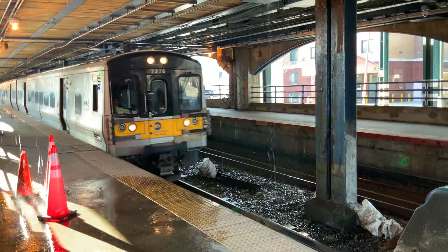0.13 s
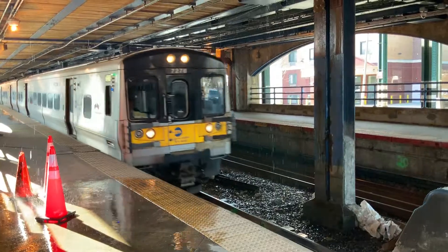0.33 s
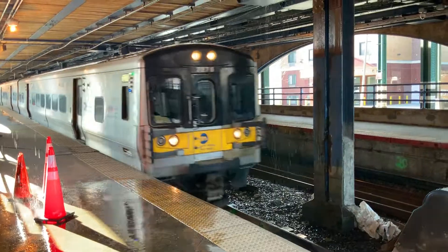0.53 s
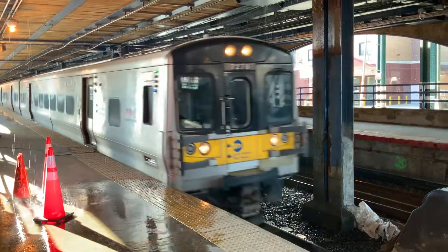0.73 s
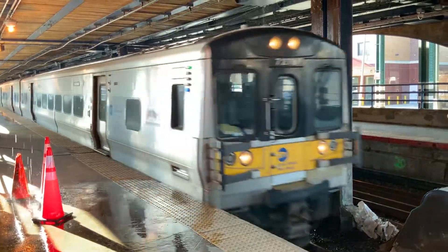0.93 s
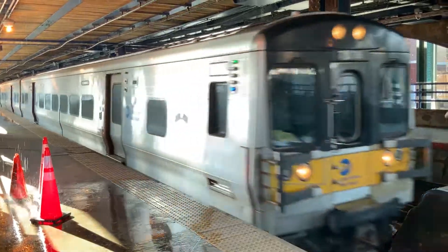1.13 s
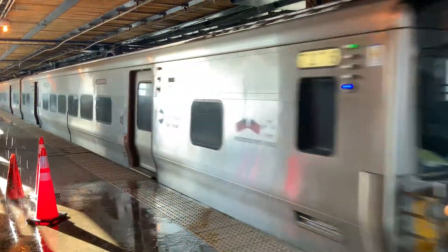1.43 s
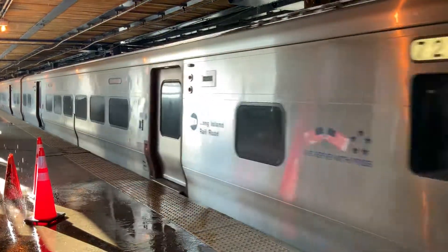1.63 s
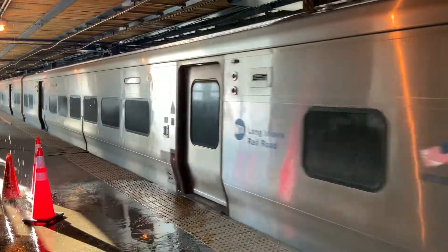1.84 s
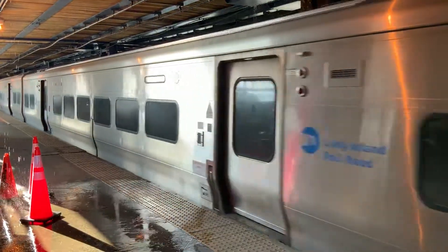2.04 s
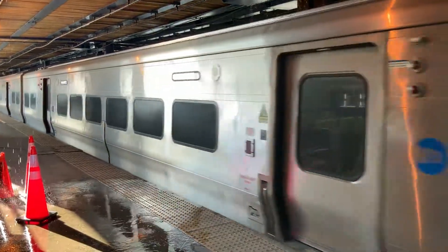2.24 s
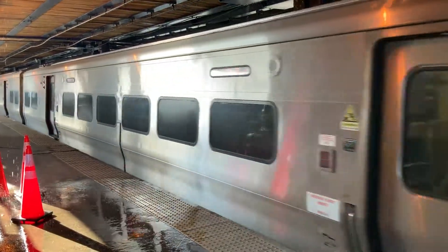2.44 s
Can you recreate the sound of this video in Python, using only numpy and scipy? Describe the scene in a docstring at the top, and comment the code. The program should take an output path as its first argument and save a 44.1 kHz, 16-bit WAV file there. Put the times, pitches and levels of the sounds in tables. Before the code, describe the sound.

Train rolling in along a covered station platform, rumbling and hissing, with wheels clacking over a joint

```python
"""A train is heard rolling in along a covered, wet platform: rumble, drone, roar and hiss, all shaped noise.
The wheels ring on the rail and a flange squeals faintly, as wavering tones and narrow-band noise. Two axles
clack over a rail joint and the bogies thump, as decaying modes and noise bursts. The running gear booms and the
rail sings in swelling tones; the roof gives the clang and sizzle of the clacks a short tail. The train is on
the right, so the left port hears it later, weaker and only partly alike."""
import sys
import numpy as np
from scipy import signal
from scipy.fft import rfft, irfft
from scipy.io import wavfile

SR = 44100
rng = np.random.default_rng(int(sys.argv[2]) if len(sys.argv) > 2 else 0)


def persist_wave(psi):
    """Save psi, clipped to +-1, as 16-bit WAV."""
    counts = np.round(np.clip(psi, -1, 1) * 32767).astype(np.int16)
    wavfile.write(sys.argv[1], SR, np.atleast_2d(counts).T)


N = 113778
# Time axis in seconds and frequency axis in Hz
T, HZ = np.arange(N) / SR, np.fft.rfftfreq(N, 1 / SR)


def rolling():
    """Broadband rolling noise: body and running gear below, wheel and rail above, modulated by uneven treads."""
    # Spectra of the sources. Each row: frequency in Hz, relative power density in dB per Hz.
    rumble_spectrum = [(15, -76), (30, -46), (60, -42.5), (100, -42), (150, -44.5), (250, -55.5),
                       (500, -86)]  # cars
    drone_spectrum = [(50, -55), (100, -47.5), (135, -42), (172, -38), (205, -43.5), (255, -42),
                      (315, -45.5), (380, -49), (520, -55.5), (1000, -83.5)]  # running gear
    roar_spectrum = [(200, -86), (370, -57.5), (460, -50), (560, -52.5), (650, -49.5), (770, -51.5),
                     (950, -52), (1080, -54), (1250, -61), (1650, -61.5), (2150, -59.5), (2500, -64),
                     (3300, -61.5), (6000, -76.5), (12000, -113)]  # wheels on rail
    hiss_spectrum = [(1500, -70), (2700, -70.5), (3400, -66), (4400, -61), (5250, -62.5), (5600, -67.5),
                     (6600, -65.5), (8000, -70), (10000, -73.5), (15000, -74.5)]  # wet rail
    spray_spectrum = [(4000, -95), (7500, -74), (9600, -75.5), (10200, -74.5), (12000, -71.5), (14200, -71),
                      (15500, -79)]  # fine spray above the hiss
    # Strength of the same sources along time. Each row: time in seconds, relative level in dB.
    rumble_level = [(.12, 2), (.4, -2.5), (.52, 0), (.77, 2), (.9, 1.5), (1.35, 0.5), (1.55, -1), (1.85, 2),
                    (2.03, 3), (2.12, 3), (2.25, -2.5), (2.45, 2.5), (2.58, -4)]
    drone_level = [(.12, -9), (.6, -4.5), (.98, -3), (1.22, -1), (1.37, 0), (1.52, -2), (1.85, -3),
                   (2.0, 2), (2.25, 1), (2.43, 1.5), (2.58, 2)]  # grows as the first bogie comes near
    roar_level = [(.12, -2), (.5, -1), (.9, -0.5), (1.15, 1.5), (1.35, 2.5), (1.6, 2), (1.8, 0.5),
                  (1.93, 2.5), (2.25, 1.5), (2.43, 3), (2.58, 1.5)]
    hiss_level = [(.12, -5.5), (.42, 2), (.68, 2), (.9, -1), (1.15, -0.5), (1.38, -5), (1.6, -4.5),
                  (1.8, -4), (2.05, -1), (2.2, 2), (2.42, 3.5), (2.58, -1)]
    spray_level = [(.12, 2), (.3, 0.5), (.55, 0.5), (.9, -6), (1.15, -5), (1.39, -7), (1.58, 1.5),
                   (1.67, -2.5), (1.92, 1.5), (2.2, -0.5), (2.58, -2.5)]

    rumble = noise(rumble_spectrum) * level(rumble_level)
    drone = noise(drone_spectrum) * level(drone_level)
    roar = noise(roar_spectrum) * level(roar_level)
    hiss = noise(hiss_spectrum) * level(hiss_level)
    spray = noise(spray_spectrum) * level(spray_level)
    lower = (rumble + drone + roar) * flutter(depth_db=1.17, rate_hz=32.8)
    upper = (hiss + spray) * flutter(depth_db=0.98, rate_hz=12)
    return lower + upper


def wheel_ring():
    """Modal resonance: two wheel modes, part tone and part noise, sink in pitch; a flange adds rough chirps."""
    # Wheel modes. Each row: frequency in Hz, width in Hz, tonal share of the power 0-1, relative level in dB.
    ring_modes = [(1957, 54, 0.38, -30.5), (2940, 114, 0.03, -32.5)]
    # Strength of the lower, then of the upper mode. Each row: time in seconds, relative level in dB.
    ring_levels = [
        [(.12, -5.5), (.33, 1), (.45, -1.5), (.54, 4), (.62, -1.5), (.9, -1.5), (1.2, -5), (1.65, 2.5),
         (2.22, 1.5), (2.35, -2.5), (2.58, 2.5)],
        [(.12, -2.5), (.4, -3), (1.1, 0), (1.35, -0.5), (1.72, 1.5), (2.15, -5.5), (2.45, 4.5), (2.58, -2)],
    ]
    # Flange squeals. Each row: start in seconds, length in seconds, mid pitch in Hz, glide in Hz per second,
    # relative level in dB.
    squeals = [(1.652, 0.034, 4420, -1500, -27), (1.683, 0.033, 4330, -4000, -27),
               (1.743, .032, 4320, 1000, -33.5), (1.779, .032, 4250, 2497, -31),
               (1.812, .034, 4220, 0, -33), (1.849, 0.023, 4300, -3000, -33)]
    doppler_per_s = 0.003796  # fall of pitch, as a share of the mode frequency

    out = swells(squeals, waver_hz=100.4, rate_hz=248)
    pitch_factor = 1 - doppler_per_s * (T - T.mean())
    for (hz, width_hz, tonal, db), curve in zip(ring_modes, ring_levels):
        sung = np.sqrt(tonal) * tone(hz * pitch_factor, waver_hz=12.1, rate_hz=20.2)
        shaken = np.sqrt(1 - tonal) * resonance(hz, width_hz)
        out += amp(db) * level(curve) * (sung + shaken)
    return out


def rail_joint():
    """Impact excitation: blows ring track and steel directly; clang and sizzle also spread under the roof."""
    # Wheel blows at the joint. Each row: start in seconds, then relative levels of knock, ring, clang
    # and sizzle in dB.
    clacks = [(1.0317, 8, -6, 1.5, -4), (1.041, 2, -12, -7, -1), (1.047, 6.5, 1, -2, -4),
              (1.062, 3, -14, -4, -12), (1.072, -5, -5, 1.5, -2.5), (1.084, 2, -14, -19, -16),
              (1.096, 1, -7, -2.5, -9), (1.120, 3, -14, -7, -20), (1.146, 3, -16, -23, -22),
              (1.163, -2, -18, -24, -26), (1.412, -6, -10, -8, -2), (1.424, -1, 1, -0.5, -0.5),
              (1.435, -3, 6.5, 0.5, -5), (1.446, -3, 0, -1, -16), (1.459, -8, -12, -4, -12)]
    # Low modes of the track, high modes of the steel rail. Each row: frequency in Hz, relative level in dB, #
    # time to decay by 60 dB in seconds.
    track_modes = [(317, -23, .07), (441, -25.5, 0.061), (540, -19, 0.039), (651, -11, 0.047),
                   (718, -12.5, 0.017), (900, -26, 0.021)]
    steel_modes = [(1830, -22, 0.068), (2130, -19.5, 0.075), (3060, -30, 0.055), (3500, -22, 0.074)]
    # Noise of the steel. Each row: frequency in Hz, relative power density in dB per Hz.
    clang_spectrum = [(150, -51), (480, -44), (850, -44), (1100, -57.5), (1450, -55.5), (1800, -55.5),
                      (2170, -55), (2550, -59.5), (3050, -60), (3900, -52), (5000, -58.5), (8000, -72),
                      (15000, -93)]
    sizzle_spectrum = [(3000, -71), (6000, -60), (9000, -59.5), (10500, -56.5), (14000, -57.5),
                       (15500, -64)]

    times, knock_db, ring_db, clang_db, sizzle_db = np.transpose(clacks)
    clang = noise(clang_spectrum) * blows(times, clang_db, t60=0.16)
    sizzle = noise(sizzle_spectrum) * blows(times, sizzle_db, t60=0.16)
    knock = strike(times, knock_db, track_modes)
    ring = strike(times, ring_db, steel_modes)
    return roof(clang + sizzle) + knock + ring


def bogies():
    """Impact and resonance at low frequency: the suspension thumps, the running gear booms and the rail sings."""
    # Dull thumps. Each row: start in seconds, relative level in dB.
    thump_times = [(1.033, -2), (1.224, -4), (1.299, -8), (1.495, -5.5), (1.585, -10), (1.954, -4.5),
                   (2.004, 2.5), (2.395, 3.5), (2.483, 2)]
    # Noise of a thump. Each row: frequency in Hz, relative power density in dB per Hz.
    thump_spectrum = [(40, -41), (120, -52), (260, -39), (370, -34.5), (600, -62), (1200, -88)]
    # Modes of a thump. Each row: frequency in Hz, relative level in dB, time to decay by 60 dB in seconds.
    thump_modes = [(65, -30, 0.084), (167, -19, 0.065), (268.5, -18.5, 0.26), (315, -19, 0.14)]
    # Resonances that swell and fade as the train rolls: the rows at 670 and 623 Hz are the rail singing, # the
    # rest the running gear. Each row: start in seconds, length in seconds, mid pitch in Hz, # glide in Hz per
    # second, relative level in dB.
    booms = [(.1, .52, 670, -60, -32), (.86, .2, 623, -110, -28.5), (.86, .18, 92.8, -61, -23),
             (1.09, 0.306, 173.1, -25, -21.5), (1.24, .1, 281.4, -200, -25.5),
             (1.43, .22, 240.3, -100, -23.5), (1.57, 0.059, 161, 1, -26), (1.68, .14, 255, -61.5, -24.5),
             (1.8, 0.16, 138.7, 59.5, -22.5), (1.96, .22, 260.8, -130, -22.5), (2.2, .3, 313.2, 20, -23),
             (2.33, .2, 146, 50, -24)]

    times, thump_db = np.transpose(thump_times)
    thud = noise(thump_spectrum) * blows(times, thump_db, t60=0.14)
    body = strike(times, thump_db, thump_modes)
    return thud + body + swells(booms, waver_hz=5.86, rate_hz=25.3)


def roof(x):
    """Reverberation: convolution with decaying, dull noise adds the short tail of the platform roof."""
    tail_db = -6.5
    tail = noise([(2500, 1.5), (12000, -8.0)]) * blows([.01], [0], t60=0.45)  # begins after 10 ms
    tail = tail[:, :SR] / np.linalg.norm(tail[0])
    return x + amp(tail_db) * signal.fftconvolve(x, tail, axes=1)[:, :N]


def ports(x):
    """Interaural-style cues: the left port hears the train later, weaker and only partly correlated."""
    # Each row: frequency in Hz, level of left minus right in dB.
    balance = [(30, 2), (130, -4.5), (280, -6.5), (500, -12), (660, -4.5), (950, -7.5), (1350, -9.5),
               (1700, -8.5), (2050, -12.5), (2700, -2.5), (3300, -0.5), (5200, 0), (5700, -7.5),
               (6700, -2.5), (9000, -1), (15000, 0)]
    # Each row: frequency in Hz, likeness of the two ports 0-1.
    likeness = [(60, .997), (250, 1), (430, 0.76), (660, 0.6), (1000, 0.85), (1500, 0.36), (1750, 0.28),
                (2150, 0.12), (2850, 1), (3300, 0.086), (4400, 0.49), (6500, 0.88), (9000, 0.79),
                (11000, 1), (15000, 0.74)]
    # Each row: frequency in Hz, lag of the left port in cycles.
    lag = [(0, 0), (400, .02), (650, -.22), (1350, .5), (1800, 1), (2500, 2), (4000, 2.5), (5100, 3.5),
           (8600, 6.5), (10170, 7.5), (15300, 11.5)]

    direct, diffuse = rfft(x)
    same = np.clip(by_hz(likeness), 0, 1)
    ratio = amp(by_hz(balance))
    late = np.exp(-2j * np.pi * np.interp(HZ, *np.transpose(lag)))
    left = ratio * (same * late * direct + np.sqrt(1 - same ** 2) * diffuse)
    return irfft(np.array([left, direct]) / np.sqrt(1 + ratio ** 2), N)  # total power is kept


def strike(times, levels_db, modes):
    """Modal synthesis: each blow sets decaying sinusoids ringing, a little differently every time."""
    pitch_spread, attack_s = 0.019, 0.00098  # spread is a share of the mode frequency
    out, t = np.zeros((2, N)), T[:SR // 4]
    for start, strength_db in zip(times, levels_db):
        part = out[:, round(start * SR):][:, :len(t)]  # a view: adding to it fills out
        for hz, db, t60 in modes:
            struck_hz = hz * (1 + pitch_spread * rng.standard_normal())
            turns = struck_hz * t + [[0], [rng.random()]]
            envelope = amp(strength_db + db - 60 * t / t60) * np.minimum(t / attack_s, 1)
            ring = envelope * np.sin(2 * np.pi * turns)
            part += ring[:, :part.shape[1]]
    return out


def blows(times, levels_db, t60):
    """Exponential decay: every blow rises quickly and dies away, and the powers of all are summed."""
    attack_s = 0.0027
    age = np.maximum(T - np.asarray(times)[:, None], 0)
    decay = amp(np.asarray(levels_db)[:, None] - 60 * age / t60)
    each = np.minimum(age / attack_s, 1) * decay
    return np.sqrt((each ** 2).sum(0))


def swells(table, waver_hz, rate_hz):
    """Transient resonance: gliding tones each rise and fall once under a half-sine envelope."""
    out = np.zeros((2, N))
    for start, length, hz, glide, db in table:
        part = np.clip((T - start) / length, 0, 1)
        pitch = hz + glide * length * (part - .5)
        out += amp(db) * np.sin(np.pi * part) * tone(pitch, waver_hz, rate_hz)
    return out


def tone(hz, waver_hz, rate_hz):
    """Frequency and amplitude modulation: a sustained vibration whose pitch and strength waver at random."""
    turns = np.cumsum(hz + waver_hz * wander(rate_hz)) / SR + rng.random((2, 1))
    return np.sqrt(2) * np.sin(2 * np.pi * turns) * flutter(depth_db=4.3, rate_hz=rate_hz)


def resonance(hz, width_hz):
    """Random excitation of a resonator: two narrow-band noises, rms 1, with the width at half amplitude."""
    response = 1 / (1 + (2 * (HZ - hz) / width_hz) ** 2)
    x = irfft(rfft(rng.standard_normal((2, N))) * response, N)
    return x / x.std(axis=1, keepdims=True)


def noise(spectrum):
    """Spectral shaping: two uncorrelated white noises are filtered to the given power density."""
    white = rng.standard_normal((2, N))
    return irfft(rfft(white) * amp(by_hz(spectrum)), N) * np.sqrt(SR / 2)


def flutter(depth_db, rate_hz):
    """Amplitude modulation: a gain that wavers at random, its depth given as rms."""
    return amp(depth_db * wander(rate_hz))


def wander(rate_hz):
    """Low-pass random process: noise kept mainly below the given rate, rms 1."""
    x = irfft(rfft(rng.standard_normal(N)) / (1 + (HZ / rate_hz) ** 4), N)
    return x / x.std()


def level(points):
    """Level contour: decibels joined by straight lines in time become a gain."""
    return amp(np.interp(T, *np.transpose(points)))


def by_hz(points):
    """Logarithmic frequency scale: table values joined by straight lines along log frequency."""
    f, value = np.transpose(points)
    return np.interp(np.log(HZ + 1), np.log(f), value)


def amp(db):
    """Decibel definition: 20 dB is a factor of ten in amplitude."""
    return 10 ** (np.asarray(db) / 20)


def scene():
    """Superposition: the sources of the train add up and reach the two ports."""
    return ports(rolling() + wheel_ring() + bogies() + rail_joint())


def record(dry):
    """Clipping, gating and low-pass filtering: peaks are capped, the start is abrupt and the top is cut off."""
    start_s, edge_hz = .12, 15650
    x = np.clip(dry, -.92, .92) * (T >= start_s)
    lowpass = signal.firwin(511, edge_hz, window=("kaiser", 9), fs=SR)
    return signal.oaconvolve(x, lowpass[None], "same")


dry = scene()
out = record(dry)
persist_wave(out)
```